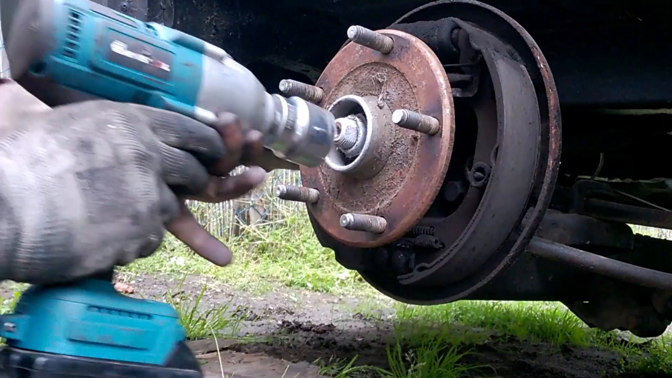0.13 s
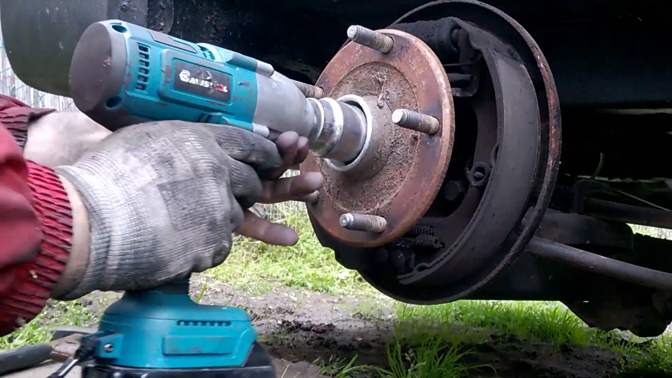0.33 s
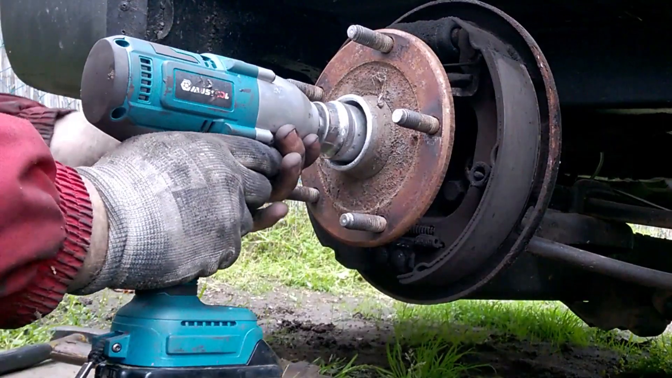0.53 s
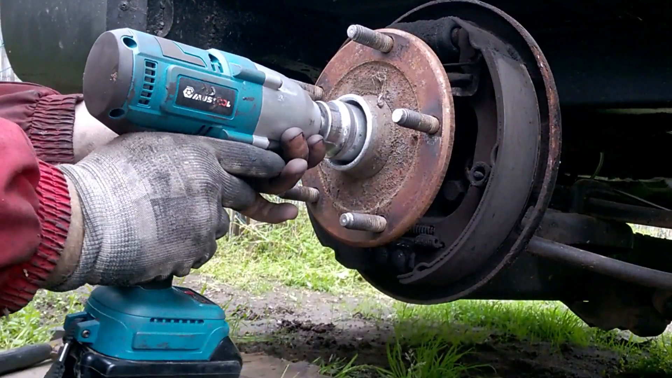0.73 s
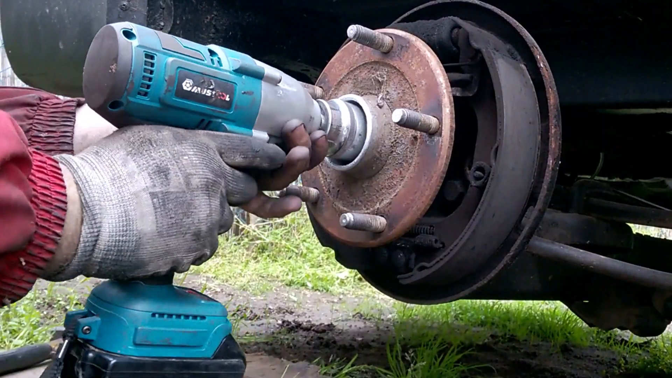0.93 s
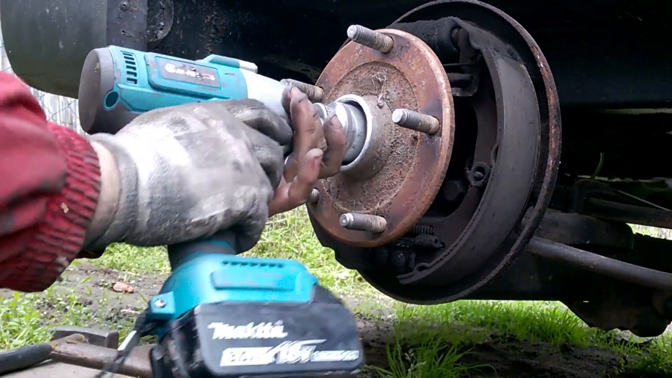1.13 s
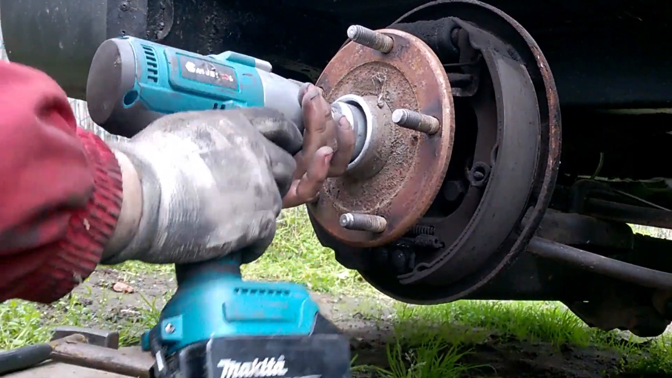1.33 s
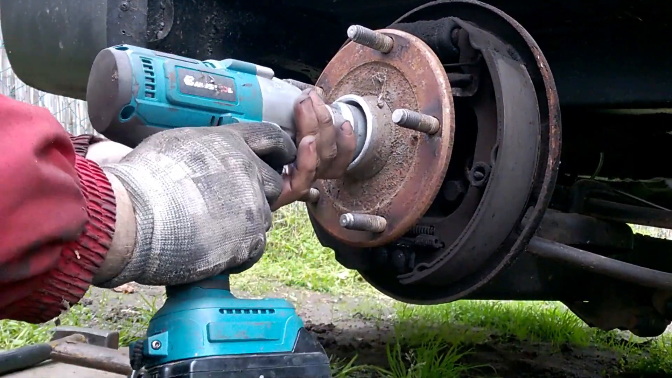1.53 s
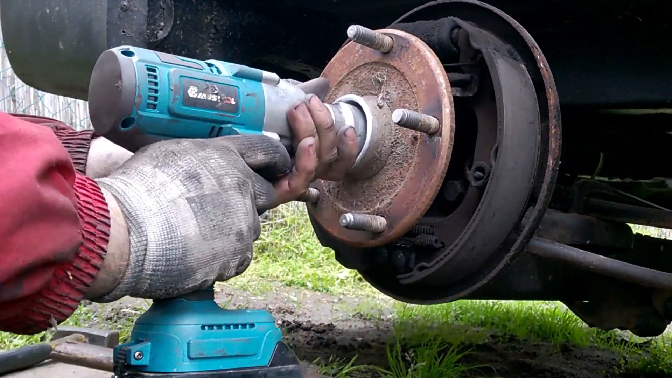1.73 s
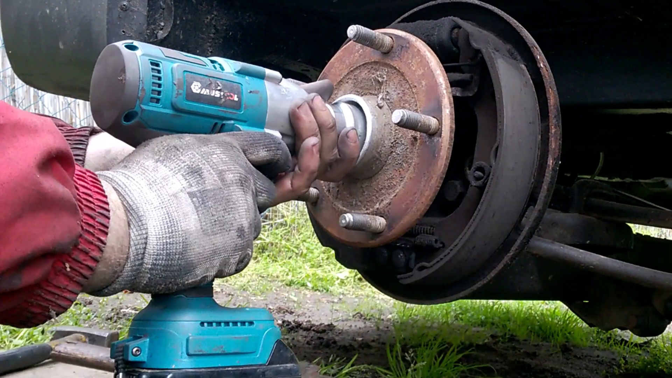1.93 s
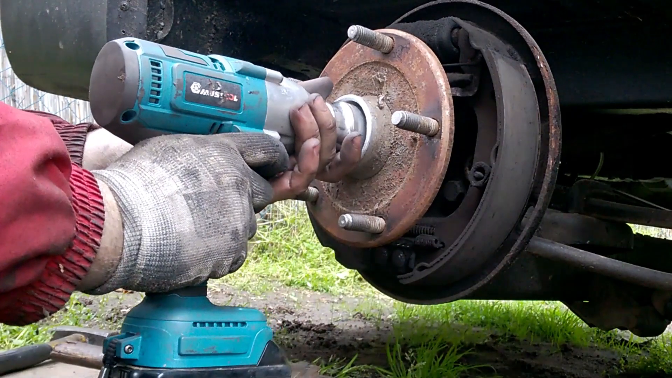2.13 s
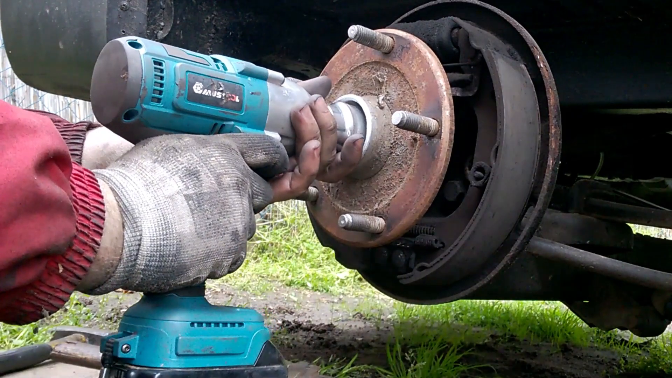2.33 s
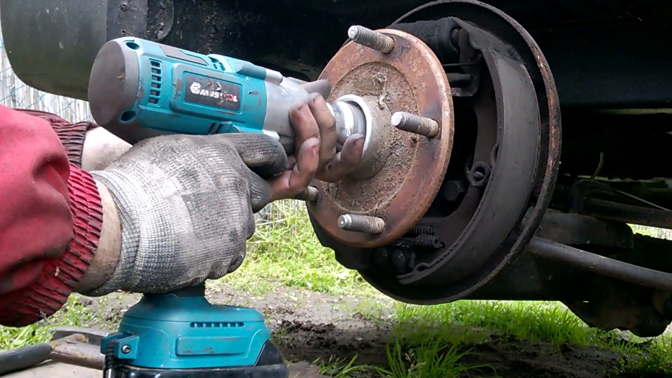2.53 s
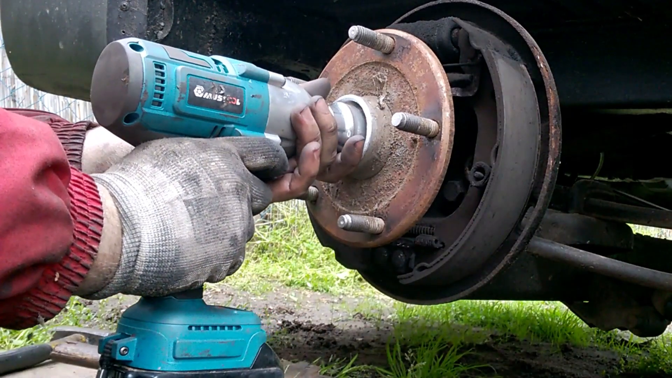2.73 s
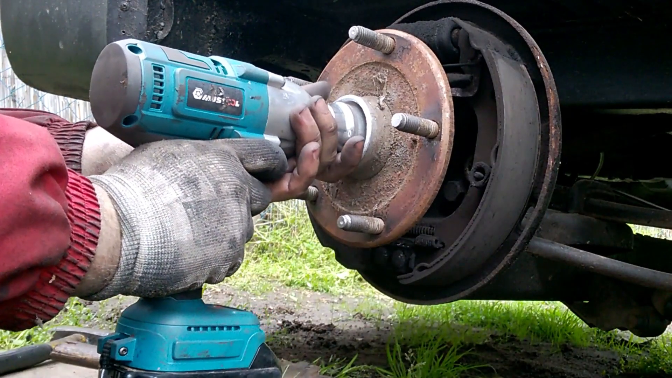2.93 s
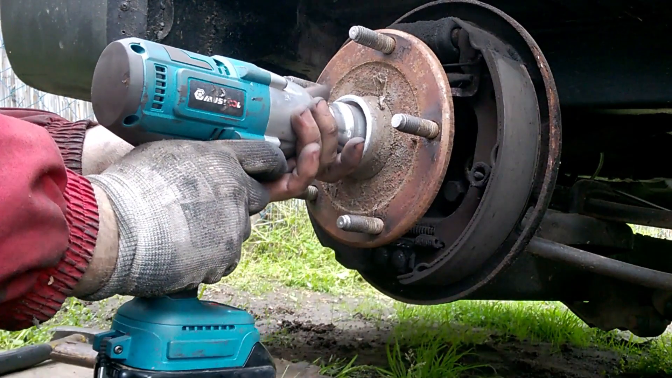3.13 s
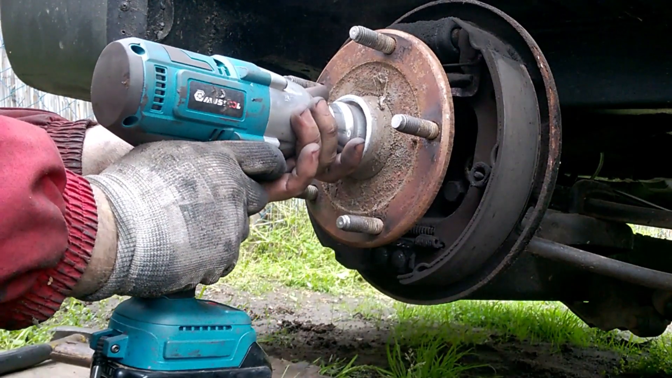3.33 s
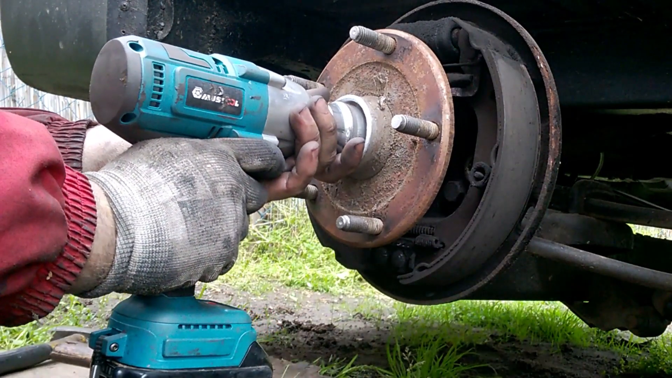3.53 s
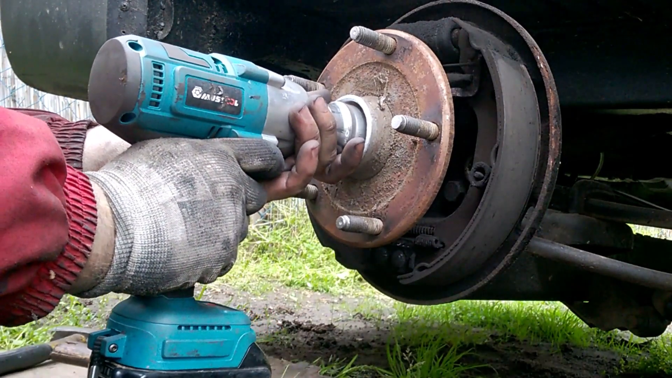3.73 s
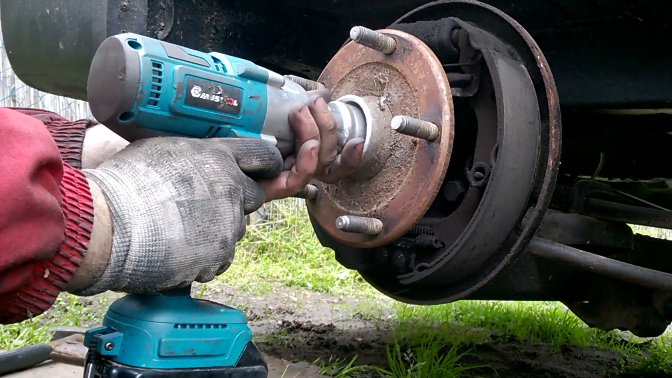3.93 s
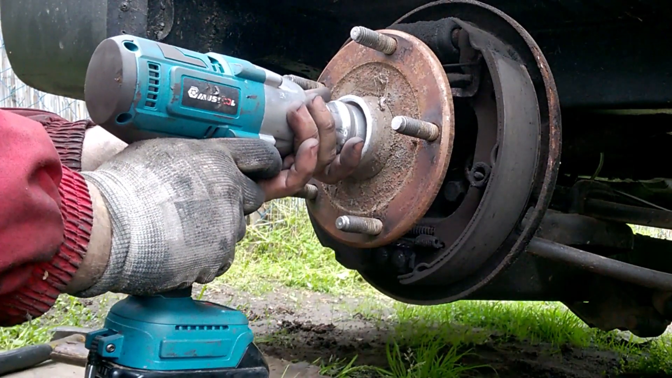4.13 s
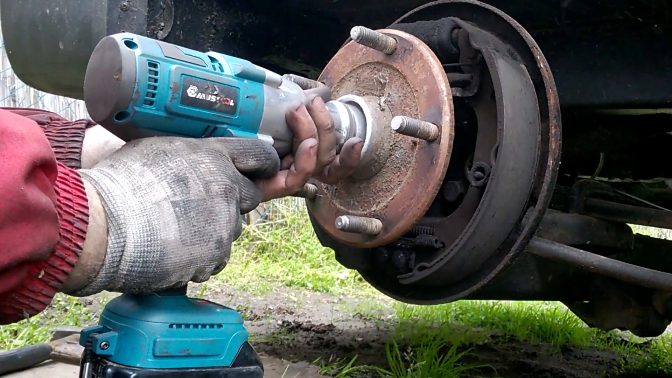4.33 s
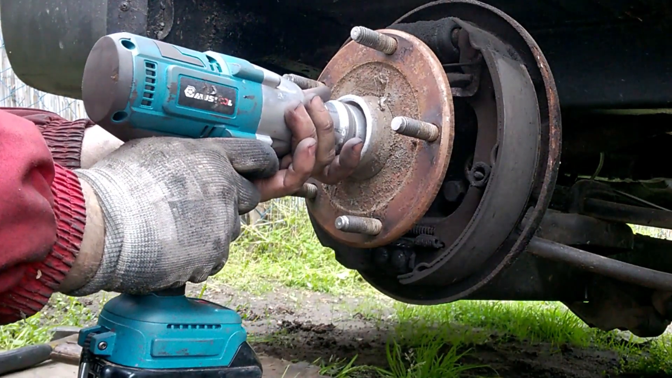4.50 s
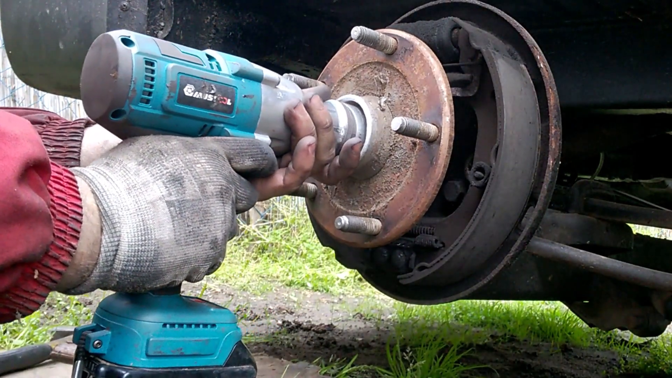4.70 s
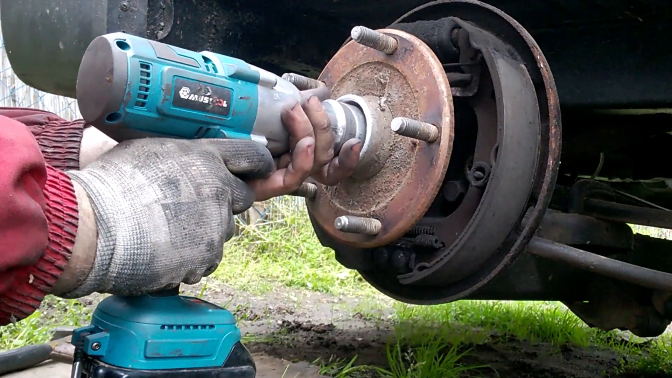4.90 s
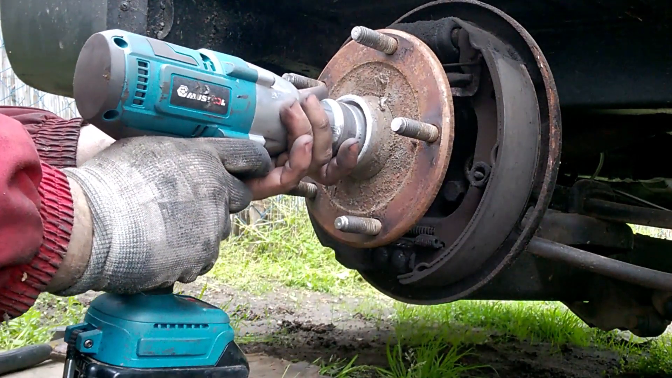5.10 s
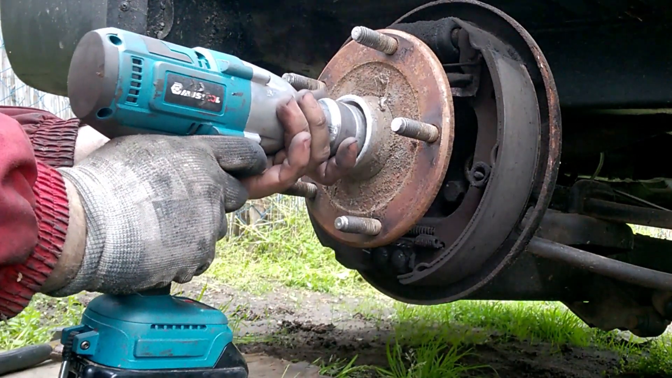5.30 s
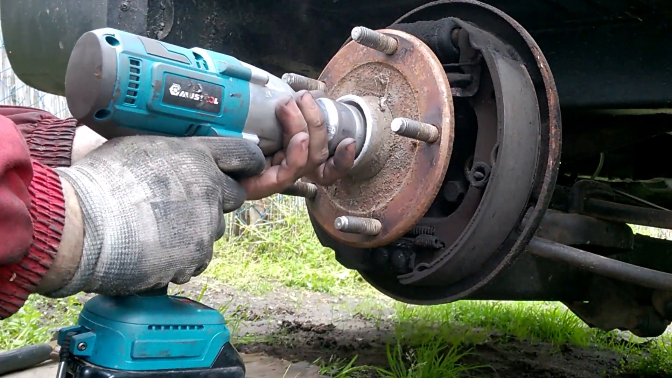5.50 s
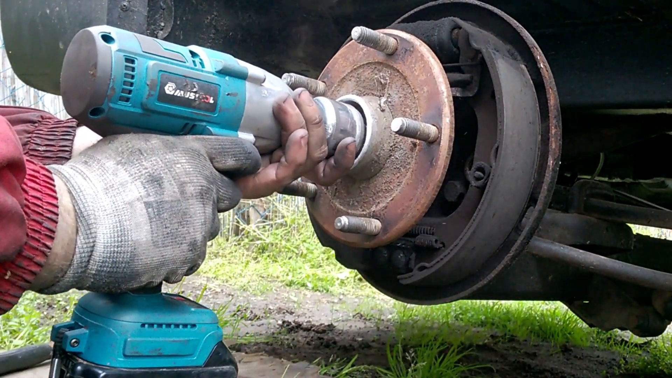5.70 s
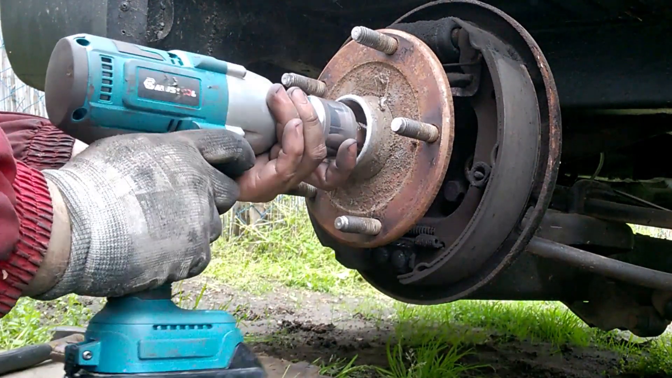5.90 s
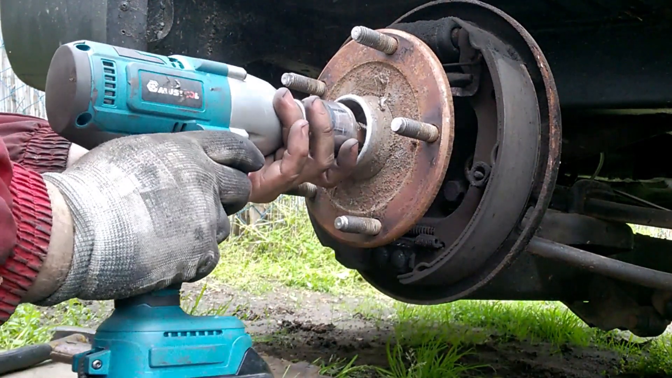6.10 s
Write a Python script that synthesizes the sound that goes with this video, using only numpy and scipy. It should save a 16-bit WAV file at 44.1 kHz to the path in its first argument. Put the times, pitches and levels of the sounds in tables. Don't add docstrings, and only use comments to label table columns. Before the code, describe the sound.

A few metallic knocks, then a cordless impact wrench hammers a hub nut in a harsh, steady clatter before a loud clack, brief whine and abrupt stop.

```python
import sys
import numpy as np
from scipy import signal
from scipy.fft import rfft, irfft
from scipy.io import wavfile
from scipy.ndimage import uniform_filter1d

SR = 44100
rng = np.random.default_rng(int(sys.argv[2]) if len(sys.argv) > 2 else 0)


def amplitude_ratio(level_db):
    exponent = np.asarray(level_db, float) / 20
    return 10 ** exponent


def file_out(sig):
    cols = np.atleast_2d(sig).T
    lim = np.clip(cols, -1, 1)
    pcm = np.round(lim * 32767).astype(np.int16)
    wavfile.write(sys.argv[1], SR, pcm)


N = 275801

# mode_hz, level_db
HUB_MODES = [(182, -13), (376, -8.5), (520, -5.5), (640, -5.5), (952, -13), (1015, 7), (1160, -2),
             (1230, 0.5), (1533, 4), (1954, -30.5), (2208, 7.5), (2450, 8.5), (2566, 4.5), (2720, 7),
             (2880, 5), (3030, -10), (3408, -21.5), (3620, 2.5), (4320, -9.5), (4758, 2), (5115, -21),
             (5465, 0.5), (5754, 5), (6700, -4), (9210, -24.5), (10700, -10)]
# blows_struck, time_s
HAMMER_PACE = [(0, 1.5778), (11, 1.811), (39, 2.443), (54, 2.776), (65, 3.0115), (77, 3.2742),
               (107, 3.9432), (128, 4.4165), (135, 4.576), (144, 4.789), (145, 4.8172), (149, 4.9085),
               (165, 5.3225), (168, 5.407), (174, 5.56), (179, 5.6912), (180, 5.7259), (181, 5.75)]


def rms_one(x):
    return x / np.sqrt(np.mean(x ** 2) + 1e-20)


def in_time(rows):
    s, *columns = np.transpose(rows)
    time = np.arange(N) / SR
    return [np.interp(time, s, column) for column in columns]


def at_hz(points, hz):
    table_hz, table_db = np.transpose(points)
    return np.interp(np.log(hz), np.log(table_hz), table_db)


def colour(x, points):
    size = 4096
    hz = np.arange(size // 2 + 1) * SR / size + 1
    cepstrum = irfft(np.log(amplitude_ratio(at_hz(points, hz))))
    cepstrum[1:size // 2] *= 2
    cepstrum[size // 2 + 1:] = 0
    response = irfft(np.exp(rfft(cepstrum)))
    return signal.fftconvolve(x, response)[:len(x)]


def band(x, low_hz, high_hz):
    edges_hz = [low_hz, min(high_hz, SR / 2.1)]
    return signal.sosfilt(signal.butter(2, edges_hz, "band", fs=SR, output="sos"), x)


def drift(rate_hz):
    r = np.exp(-2 * np.pi * rate_hz / SR)
    slow = signal.lfilter([1], [1, -2 * r, r * r], rng.standard_normal(N + SR))
    return rms_one(slow[SR:])


def ring(clicks, hz, t60):
    r, w = amplitude_ratio(-60 / (t60 * SR)), 2 * np.pi * hz / SR
    return signal.lfilter([0, np.sin(w)], [1, -2 * r * np.cos(w), r * r], clicks + 1e-18)


def air():
    # hz, level_db
    air_spectrum = [(71, -47), (120, 8.5), (188, -2.5), (483, -13), (1620, -16.5), (1860, -20.5),
                    (5630, -26), (8140, -45.5), (16000, -40)]
    # time_s, level_db
    air_drift = [
        (.03, 1.5),
        (.9, -1.5),
        (1.4, -0.5),
        (5.9, 6),
        (6.25, -12),
    ]
    base_db, low_db = -52, -2
    level_db, = in_time(air_drift)
    hiss = rms_one(colour(rng.standard_normal(N), air_spectrum))
    low = signal.sosfilt(signal.butter(1, 2000, fs=SR, output="sos"), hiss)
    return amplitude_ratio(base_db + level_db + 0.6 * drift(4)) * (hiss + (amplitude_ratio(low_db) - 1) * low)


def chassis():
    # time_s, peak_db
    jolts = [
        (.262, -25),
        (.37, -21),
        (0.442, -11.5),
        (.73, -30),
        (1.131, -17.5),
        (1.375, -34.5),
        (1.72, -30),
        (2.62, -33.5),
        (5.01, -29.5),
        (5.76, -22),
    ]
    # mode_hz, level_db, t60_s
    springs = [(27.97, -4, 1.28), (54, -3, 0.25), (109, -3, 0.081)]
    # low_hz, high_hz, rest_db, hammering_db, jolt_share_db, jolt_t60_s
    rumble = [(22, 37, -51, -48.5, -13.5, 1.14), (36.3, 65, -49.5, -42.5, -9.5, 0.67),
              (65.5, 110, -59, -54.5, -18, .5), (110, 230, -67.5, -56.5, -23.5, .4)]
    lumpy_db, swell_s = 3.0, 0.063
    time, clicks = np.arange(N) / SR, np.zeros(N)
    for s, peak_db in jolts:
        clicks[int(s * SR)] = amplitude_ratio(peak_db)
    out = sum(amplitude_ratio(level_db - 5.0) * ring(clicks, hz, t60) for hz, level_db, t60 in springs)
    struck = (time > HAMMER_PACE[0][1]) * (time < HAMMER_PACE[-1][1])
    hammering = uniform_filter1d(1.0 * struck, size=4000)
    for low_hz, high_hz, rest_db, busy_db, share_db, t60 in rumble:
        dying = signal.lfilter([1], [1, -amplitude_ratio(-60 / (t60 * SR))], clicks)
        swell = uniform_filter1d(dying, int(swell_s * SR))
        level = amplitude_ratio(rest_db) + amplitude_ratio(busy_db) * hammering + amplitude_ratio(share_db) * swell
        noise = band(band(rng.standard_normal(N), low_hz, high_hz), 0.87 * low_hz, 1.02 * high_hz)
        out += level * amplitude_ratio(lumpy_db * drift(3.9)) * rms_one(noise)
    return out


def scuffs():
    # time_s, level_db, t60_s
    scuff_events = [
        (0.661, -54, 0.13),
        (6.1, -65, 0.11),
        (6.148, -56, .08),
    ]
    time = np.arange(N) / SR
    noise = rms_one(band(band(rng.standard_normal(N), 4300, 5800), 4000, 6600))
    envelope = np.zeros(N)
    for s, level_db, t60 in scuff_events:
        envelope += amplitude_ratio(level_db - 60 * np.abs(time - s) / t60) * np.clip((time - s) / 0.004, 0, 1)
    return noise * envelope


def rings():
    # start_s, mode_hz, level_db, t60_s
    ring_events = [(.222, 8900, -49, 0.25), (0.223, 5450, -45, 0.18), (0.234, 2920, -37, 0.24),
                   (.245, 501, -32, 0.38), (0.333, 1270, -24, 0.039), (0.334, 228, -31.5, 0.28),
                   (0.401, 1196, -10.5, 0.035), (.4, 756, -25, 0.1), (0.404, 5420, -41, 0.4),
                   (.41, 518, -32, 0.34), (0.413, 335, -33, 0.41), (0.689, 2710, -42, .1),
                   (1.091, 5200, -12, 0.022), (1.092, 1206, -15, 0.11), (1.099, 386, -18.5, 0.25),
                   (1.101, 547, -23.5, 0.33), (1.112, 3150, -12, 0.057), (1.113, 3240, -31, 0.2),
                   (1.112, 6500, -40, .06), (5.95, 2580, -46, 0.53), (6.004, 5900, -47, 0.13),
                   (1.566, 207, -28, 0.6), (1.57, 274, -25, 0.64), (1.57, 397, -23, 0.46)]
    out, chatter, flutter = np.zeros(N + SR), np.hanning(90), amplitude_ratio(4.0 * drift(60))
    for s, hz, level_db, t60 in ring_events:
        push, at = np.zeros(SR), int(s * SR)
        push[:len(chatter)] = chatter * np.sin(2 * np.pi * hz * np.arange(len(chatter)) / SR)
        push *= amplitude_ratio(level_db) / chatter.sum()
        start = rng.integers(N - SR)
        pair = ring(push, hz, t60) + ring(push, hz * 1.012, 0.5 * t60)
        out[at:at + SR] += flutter[start:start + SR] * pair
    return out[:N]


def knocks():
    # start_s,
    # peak_db, thud_db, clack_db, tail_share_db
    knock_events = [(0.2223, -23, -6, 3, 6), (0.328, -38.5, -23, -2, -13), (0.3336, -24.5, -8, -2, -13),
                    (0.389, -24, -11, 8, -7), (0.4001, -11.5, -5, -3, -7), (0.4201, -19.5, -3, -24, -23),
                    (0.6855, -16.5, -27, -6.5, -15.5), (1.065, -28, 1.5, 10, -1),
                    (1.0887, -12, -4, 4, -5.5), (1.1137, -29, 0, -8, -13), (1.355, -44, 5, 9.5, -8.5),
                    (1.376, -44.5, 4.5, -4, -18), (1.383, -36.5, -6, -3, -21),
                    (1.4704, -45, -13.5, -16, -14), (1.48, -37, -18.5, -20, -14.5),
                    (1.489, -19.5, -20, -3, 0), (5.772, -2.5, -17, 1.5, -6), (6.1474, -54, -14, -20, -9)]
    # low_hz, high_hz, rise_s, tail_t60_s
    parts = [(169, 610, 0.015, 0.33), (815, 1560, 0.0013, 0.14), (2070, 3280, 0.00052, 0.19),
             (3800, 5750, 0.00056, .15), (6600, 6700, .0004, 0.071)]
    out = np.zeros(N + SR)
    age = np.arange(SR // 3) / SR
    for s, peak_db, thud_db, clack_db, tail_db in knock_events:
        part_levels_db = [thud_db, clack_db, 0, -1.5, -30]
        at = int(s * SR)
        for (low_hz, high_hz, rise, t60), part_db in zip(parts, part_levels_db):
            burst = np.exp(-age / (0.003 + rise))
            tail = amplitude_ratio(tail_db - 60 * age / t60)
            shape = (1 - np.exp(-age / rise)) * (burst + tail)
            noise = band(rng.standard_normal(len(age)), low_hz, high_hz)
            noise = rms_one(band(noise, low_hz * 0.62, high_hz * 1.36))
            out[at:at + len(age)] += amplitude_ratio(peak_db + part_db - 9.5) * noise * shape / shape.max()
    return out[:N]


def tone(rows, partials, beat_hz):
    hz, level_db = in_time(rows)
    time = np.arange(N) / SR
    turn = 2 * np.pi * np.cumsum(hz * (1 + 0.015 * drift(257))) / SR
    beat = 1 + 0.33 * np.sin(2 * np.pi * beat_hz * time + 1.1 * drift(40))
    chord = sum(amplitude_ratio(part_db + 2.9 * drift(90)) * np.sin(k * turn) for k, part_db in partials)
    return chord * beat * amplitude_ratio(level_db + 4.0) * (time > rows[0][0]) * (time < rows[-1][0])


def motor():
    # time_s, whirr_db
    effort = [
        (1.468, -65),
        (1.489, -47),
        (1.494, -27.5),
        (5.8, -28.5),
        (5.9, -31),
        (5.93, -30.5),
        (5.955, -27),
        (5.98, -40),
        (6.07, -78),
    ]
    # hz, level_db
    whirr_spectrum = [(88, -43), (150, -18), (905, -13.5), (1600, -12), (2060, -13.5), (3220, -9),
                      (3700, -10.5), (4860, -12), (7180, -18.5), (16000, -31.5)]
    # time_s, mesh_hz, whine_db
    whine = [
        (5.77, 1270, -38),
        (5.8, 1375, -34),
        (5.84, 1560, -35),
        (5.884, 1630, -30.5),
        (5.905, 1576, -31),
        (5.925, 1490, -42),
        (5.975, 1044, -51),
    ]
    # multiple, level_db
    mesh = [(1, -7), (2, 1.5), (3, -6), (4, -12), (5, -31), (6.43, -25), (7.1, -28)]
    # time_s, pitch_hz, level_db
    squeal = [
        (5.925, 3500, -60),
        (5.935, 3420, -36),
        (5.96, 2800, -39),
        (5.985, 2200, -62),
    ]
    spin_up_s, spin_up_db = 0.065, -22
    brush_db, stop_s, stop_db_per_s = -48, 5.965, 900
    time, (whirr_db,) = np.arange(N) / SR, in_time(effort)
    hiss_db = brush_db + spin_up_db * np.maximum(1 - (time - effort[1][0]) / spin_up_s, 0)
    hiss_db -= stop_db_per_s * np.maximum(time - stop_s, 0)
    noise = colour(rng.standard_normal(N), whirr_spectrum)
    whirr = amplitude_ratio(whirr_db + 0.91 * drift(60)) * rms_one(band(noise, 54, 6600))
    hiss = band(band(rng.standard_normal(N), 5200, 11000), 5200, 15000)
    whirr += amplitude_ratio(hiss_db) * rms_one(hiss)
    running = time > effort[0][0]
    return whirr * running + tone(whine, mesh, beat_hz=134) + tone(squeal, [(0.97, 0)], beat_hz=90.5)


def hub_t60(hz):
    return 0.075 * (1000 / hz) ** 0.3


def strike(rows, spread_db):
    at, out = (rows[:, 0] * SR).astype(int), np.zeros(N)
    shares = amplitude_ratio(spread_db * rng.standard_normal((len(at), len(HUB_MODES))))
    shares = shares * rng.choice([-1, 1], len(HUB_MODES))
    for k, (hz, level_db) in enumerate(HUB_MODES):
        clicks = np.zeros(N)
        clicks[at] = amplitude_ratio(rows[:, 1] + level_db) * shares[:, k]
        out += ring(clicks, hz, hub_t60(hz))
    return out


def rattled_hub(push):
    wander, out = drift(5.2), np.zeros(N)
    for hz, level_db in HUB_MODES:
        swell_db = 3.26 * np.roll(wander, int(hz * 30))
        out += amplitude_ratio(level_db + swell_db) * ring(push, hz, 0.64 * hub_t60(hz))
    return out


def blow_table():
    # time_s, strength_db, sharpness_db
    first_blows = [
        (1.534, -19.5, -20),
        (1.5477, -16, 6),
    ]
    # time_s, change_db
    accents = [(1.791, 3.5), (1.857, -1), (1.9905, 5), (2.059, 5), (2.399, 6), (2.532, 3.5), (2.731, -3),
               (3.1, 1), (3.189, -1), (3.228, 3.5), (3.319, 6.5), (3.631, 2), (3.898, -3), (4.1, -6.5),
               (4.146, -6.5), (4.193, -7), (4.237, 3), (4.283, 3), (4.394, -2), (4.416, -8), (4.552, 2.5),
               (4.741, 4), (4.84, 2.5), (4.886, 5.5), (5.039, 4), (5.0615, 5.5), (5.0876, 3), (5.14, -4),
               (5.377, 2.5), (5.667, 5)]
    blow_db, blow_spread_db, jitter_s = -14, 1.5, 0.0007
    sharp_spread_db, sharp_start_db, settle_s = 2.5, 3.5, 0.08
    struck, s = np.transpose(HAMMER_PACE)
    chance = rng.standard_normal((int(struck[-1]) + 1, 3))
    at = np.interp(np.arange(len(chance)), struck, s) + jitter_s * chance[:, 0]
    strength_db = blow_db + blow_spread_db * chance[:, 1]
    for accent_s, accent_db in accents:
        strength_db[np.argmin(np.abs(at - accent_s))] = blow_db + accent_db
    sharp_db = sharp_spread_db * chance[:, 2] + sharp_start_db * np.exp(-(at - at[0]) / settle_s)
    return np.vstack([first_blows, np.transpose([at, strength_db, sharp_db])])


def hammer():
    # hz, level_db
    hammered = [(65, -30.5), (110, -19), (219, -6), (299, -22.5), (392, -9), (660, -9), (717, -11),
                (1210, -0.5), (1620, -3.5), (2500, -6.5), (4580, -7), (5530, -5), (7720, -22),
                (11000, -25.5), (16000, -38)]
    # low_hz, high_hz, level_db, crack_db, fade_db_per_cycle, end_pinch_db
    rattle_ranges = [(602, 903, 0, -26.5, 0, 12.5), (845, 1476, 6, 0.5, 10, 10),
                     (1537, 2330, 5.5, -14, 10, 7.5), (2200, 3690, 5, 3.5, 3.5, 10.5),
                     (4130, 4930, 6, -15, 3, 19.5), (5200, 8130, 3.5, 1, 1.5, 19)]
    fresh = 0.58
    pinch_spread, long_pause_per_s, pinch_power = 0.5, 50, 4
    torque_s = 1.56

    blows = blow_table()
    time = np.arange(N) / SR
    last = np.clip(np.searchsorted(blows[:, 0], time) - 1, 0, len(blows) - 1)
    since = np.abs(time - blows[last, 0])
    wound = since / np.diff(blows[:, 0], append=blows[-1, 0] + 0.0256)[last]
    working = (time >= blows[0, 0]) * (time < blows[-1, 0] + 0.06)
    strength = amplitude_ratio(blows[last, 1]) * working

    alike = rng.standard_normal(N)[(since * SR).astype(int)]
    crack = alike * (1 - fresh) + fresh * rng.standard_normal(N)
    crack = crack * np.exp(-since / 0.0027) * strength

    contacts = (rng.random(N) < 9000 / SR) * amplitude_ratio(2.4 * np.minimum(rng.exponential(1, N), 4))
    contacts = rms_one(contacts * rng.choice([-1, 1], N)) * strength * amplitude_ratio(0.84 * drift(100))

    delay = np.diff(blows[:, 0], append=blows[-1, 0] + 0.03) - 0.022
    pause = 1 + pinch_spread * rng.standard_normal(len(blows)) + long_pause_per_s * delay
    pause = np.clip(pause, 0, 3.0)[last]

    white = rng.standard_normal(N) * strength
    torque = white * amplitude_ratio(-3.0 * np.cos(2 * np.pi * (wound - 0.25))) * (time > torque_s)
    drive = amplitude_ratio(-4.5) * band(torque, 30, 550)
    for low_hz, high_hz, part_db, crack_db, fade_db, pinch_db in rattle_ranges:
        seated_db = rng.standard_normal(len(blows))[last] + drift(90)
        contact_db = -fade_db * wound - pinch_db * pause * wound ** pinch_power
        rattle = contacts * amplitude_ratio(contact_db) + amplitude_ratio(crack_db) * crack
        drive += amplitude_ratio(part_db - 2) * band(rattle * amplitude_ratio(seated_db), low_hz, high_hz)

    sharp_db = blows[last, 2] * np.clip(1 - wound, 0, 1) - 16.3 * wound
    sharp = (0.95 * contacts + 1.27 * white) * amplitude_ratio(sharp_db)
    drive += amplitude_ratio(1.5) * band(sharp + amplitude_ratio(3.0) * crack, 7800, 20000)

    scale = 1 / np.std(colour(rng.standard_normal(SR), hammered))
    body = amplitude_ratio(5.0) * scale * colour(drive, hammered)
    excited = amplitude_ratio(-41) * rattled_hub(contacts * amplitude_ratio(-5.0 * wound))
    return body + excited + amplitude_ratio(-13.0) * strike(blows, spread_db=4.0)


def scene():
    return (air() + chassis() + scuffs() + rings() + knocks() + motor() + hammer())[None]


def low_pass(x):
    return signal.sosfilt(signal.butter(12, 16300, fs=SR, output="sos"), x)


def record(dry):
    start_s, limit_db, release_db_per_s, cutoff_hz = 0.0346, -5.5, 239, 16500
    time = np.arange(N) / SR
    x = dry * np.clip((time - start_s) / 0.0026, 0, 1)
    over_db = np.maximum(20 * np.log10(np.abs(x[0]) + 1e-9) - limit_db, 0)
    release_db = release_db_per_s * time
    held_db = np.maximum.accumulate(over_db + release_db) - release_db
    gain = amplitude_ratio(-0.6 * uniform_filter1d(held_db, size=45))
    limited = 0.75 * np.tanh(x * gain / 0.75)
    cut = signal.sosfilt(signal.cheby2(14, 70, cutoff_hz, fs=SR, output="sos"), limited)
    return low_pass(cut)


dry = scene()
out = record(dry)
file_out(out)
```